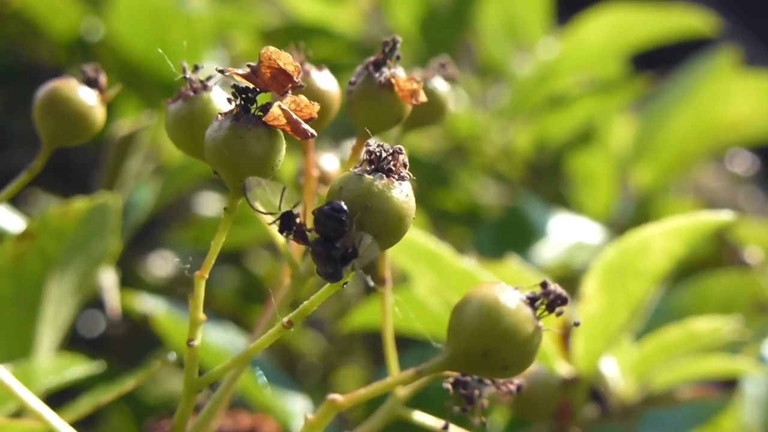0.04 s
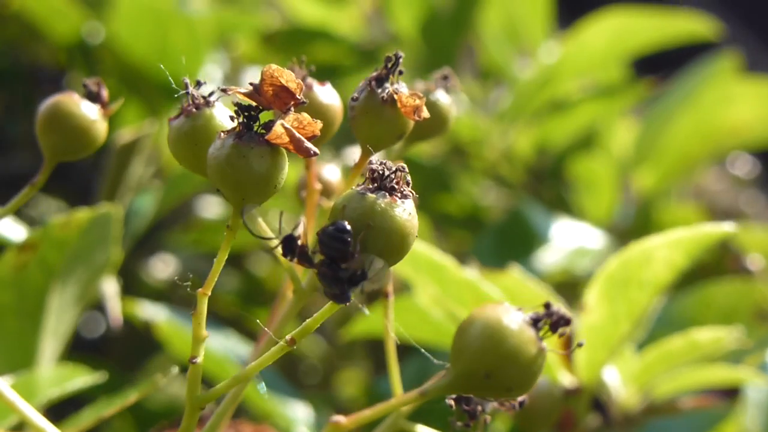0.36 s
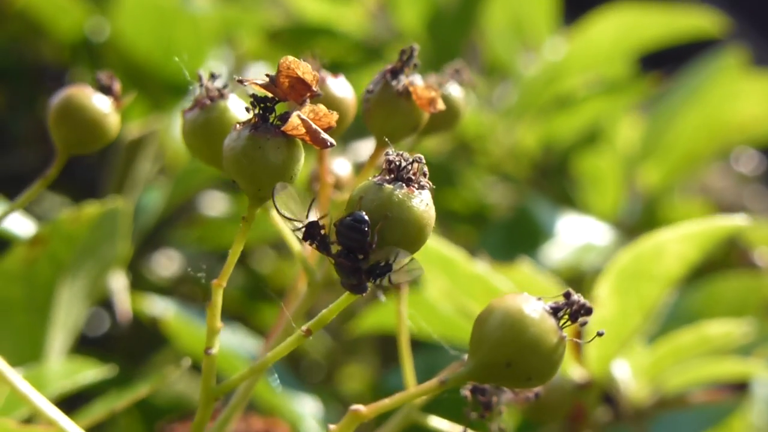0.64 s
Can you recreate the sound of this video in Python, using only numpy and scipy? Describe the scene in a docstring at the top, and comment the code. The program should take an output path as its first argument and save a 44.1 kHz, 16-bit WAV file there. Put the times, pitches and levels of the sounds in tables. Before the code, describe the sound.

Distant traffic roars steadily under thin hiss, with faint bird chirps and a few sharp clicks.

```python
"""Garden with distant traffic

After a moment of silence, a steady wash of far tyre roar cuts in under a thin hiss with faint whines.
A far engine slowly picks up speed, heard only as the hum of its firing rate and the octave above.
A distant bird whistles a few faint chirps. A few sharp handling clicks sit up close,
each a snap and a brief rub that set a camera body ringing."""
import sys
import numpy as np
from scipy import signal
from scipy.fft import rfft, irfft
from scipy.io import wavfile

SR = 44100
rng = np.random.default_rng(int(sys.argv[2]) if len(sys.argv) > 2 else 0)


def digitize_waveform(pressure):
    """Quantize a signal to 16-bit integers and store it at the path in sys.argv[1].

    Rows of a 2-D input are taken as channels; values are limited to [-1, 1].
    """
    field = np.atleast_2d(pressure).T
    bounded = np.clip(field, -1, 1)
    quanta = np.round(bounded * 32767).astype(np.int16)
    wavfile.write(sys.argv[1], SR, quanta)


N = 176400
T = np.arange(N) / SR
BIN_HZ = np.maximum(np.arange(N // 2 + 1) * SR / N, 1)

# The traffic's fader ride. Each row: time in seconds, level in dB, extra weight of the low roar in dB.
TRAFFIC_RIDE = [(.26,-43.5,-0.5),(.7,-45.5,1.5),(1.25,-45,1.5),(1.5,-46,0.6),(2.3,-44.5,-1.5),(3.4,-45.5,-0.2),(3.98,-44.5,-0.3)]
# Tone colours of traffic and hiss; mid is what both ears share, side is what differs between them.
# Each row: frequency in Hz, relative spectral density in dB.
TRAFFIC_MID_COLOUR = [(25,-26),(40,-13),(62,-7.5),(76,-8),(95,0),(160,-1),(225,1.5),(300,-1),(400,-2),(640,-2),(850,-1.7),(1060,-3),(1300,-11),(1700,-17.5),(2600,-25),(5000,-52)]
TRAFFIC_SIDE_COLOUR = [(25,-32),(55,-17),(100,-6.5),(190,-3),(340,-0.5),(1000,-3),(1400,-8),(2000,-16.5),(4000,-17.5)]
HISS_MID_COLOUR = [(800,-6.5),(1900,-1),(3000,1.5),(5000,-0.5),(7000,-1.5),(9500,-3),(10700,-4.5),(12000,-5),(13700,-7.5),(15700,-12)]
HISS_SIDE_COLOUR = [(800,-1),(1800,1.5),(3000,-3),(3700,-4),(4200,-6),(4900,-8),(6000,-10.5),(8000,-13.5),(10500,-16),(13500,-17),(15700,-23)]
# Steady whines in the hiss. Each row: pitch in Hz, level in dB.
HISS_WHINES = [(3906,-82),(6283,-83),(7558,-79.5),(8140,-77),(8785,-83),(9308,-81.5),(10060,-82),(11084,-81.5),(11700,-80.5)]
# The engine gathering speed. Each row: time in seconds, firing rate in Hz, level in dB.
ENGINE_REVS = [(.3,41.3,-78),(.85,44.3,-69),(1.3,46.3,-59.5),(1.7,51.95,-58),(2.2,52.8,-55.5),(2.45,57.65,-61),(2.95,56.3,-57),(3.15,62,-66),(3.35,57.1,-63),(3.6,55.8,-58),(4,56,-54)]
# The bird's calls. Each row: start in seconds, length in seconds, opening pitch in Hz,
# closing pitch in Hz, level in dB.
BIRD_CHIRPS = [(1.715,.06,8000,6700,-63.5),(2.305,.115,5700,5850,-64.5),(2.55,.11,6100,6150,-68),(2.56,.07,4950,4900,-67.5)]
# Handling snaps. Each row: start in seconds, gain in dB, brightness as a low-pass cutoff in Hz,
# decay time of the rub in seconds, extra weight of the low knock in dB.
HANDLING_CLICKS = [(2.3112,-6.5,10500,.0018,0),(3.1064,1.5,3650,.0005,-1),(3.8508,-7,1900,.001,6),(3.8518,-7,14000,.001,2),(3.85224,-6.5,14000,.0012,6)]
# Resonances of the camera body. Each row: pitch in Hz, gain in dB, time to fade by 60 dB in seconds.
CAMERA_MODES = [(1350,-41,.008),(1920,-27,.01),(2600,-30,.005),(3600,-22.5,.003),(4750,-24,.004),(7400,-38,.003),(8900,-33,.003),(11200,-30,.003),(13700,-22.5,.003),(14700,-28,.003)]


def from_db(db):
    """Decibels to gain."""
    return 10 ** (np.asarray(db) / 20)


def unit_rms(x):
    """Scale to unit power."""
    return x / np.sqrt(np.mean(x ** 2) + 1e-20)


def automation(rows):
    """Draw straight lines between timed breakpoints, one curve for each value column."""
    times, *columns = np.transpose(rows)
    return [np.interp(T, times, column) for column in columns]


def drift(rate_hz):
    """A smooth random wander of unit power, mostly slower than rate_hz."""
    return unit_rms(irfft(rfft(rng.standard_normal(N)) / (1 + (BIN_HZ / rate_hz) ** 2), N))


def ring(x, hz, t60):
    """One resonance driven by x, dying away by 60 dB in t60 seconds."""
    decay, angle = from_db(-60 / (t60 * SR)), 2 * np.pi * hz / SR
    feedback = decay * np.cos(angle)
    return signal.lfilter([1, -feedback], [1, -2 * feedback, decay ** 2], x + 1e-18)


def wash(colour, swell_db, rate_hz, bands=16):
    """Coloured noise of unit power whose bands each swell and fade a little on their own."""
    hz, db = np.transpose(colour)
    spectrum = rfft(rng.standard_normal(N)) * from_db(np.interp(np.log(BIN_HZ), np.log(hz), db))
    spectrum /= (1 + (hz[0] / 2 / BIN_HZ) ** 4) * (1 + (BIN_HZ / hz[-1] / 2) ** 4)  # roll off both ends
    band_of_bin = np.searchsorted(np.geomspace(hz[0], hz[-1], bands - 1), BIN_HZ)
    layers = (irfft(spectrum * (band_of_bin == k), N) for k in range(bands))
    return unit_rms(sum(layer * from_db(swell_db * drift(rate_hz)) for layer in layers))


def stereo(mid, side):
    """Left and right from mid and side."""
    return np.array([mid + side, mid - side])


def traffic():
    """Tyre roar blurred by distance, with little above a kilohertz; its low end swells, then recedes."""
    level_db, roar_db = automation(TRAFFIC_RIDE)
    mid = from_db(.5) * wash(TRAFFIC_MID_COLOUR, swell_db=1.14, rate_hz=1.8)
    side = from_db(-6) * wash(TRAFFIC_SIDE_COLOUR, swell_db=1.14, rate_hz=12)
    bed = stereo(mid, side)
    low_roar = signal.sosfiltfilt(signal.butter(3, 550, fs=SR, output="sos"), bed)
    return from_db(level_db) * (bed + (from_db(roar_db) - 1) * low_roar)


def hiss(whine_width_hz=50):
    """Wide, even hiss with narrow bands of noise whining in the centre."""
    white = rng.standard_normal(N)
    t60 = np.log(1000) / np.pi / whine_width_hz
    whines = sum(from_db(db) * unit_rms(ring(white, hz, t60)) for hz, db in HISS_WHINES)
    mid = from_db(-59) * wash(HISS_MID_COLOUR, swell_db=.5, rate_hz=12, bands=6)
    side = from_db(-54) * wash(HISS_SIDE_COLOUR, swell_db=.5, rate_hz=20, bands=6)
    return stereo(mid + whines, side)


def engine(octave_db=-10.5, flutter_db=1):
    """A low, fluttering hum: only the firing rate and its octave carry this far."""
    firing_hz, level_db = automation(ENGINE_REVS)
    phase = 2 * np.pi * np.cumsum(firing_hz) / SR
    octave = from_db(octave_db + 2.4 * drift(3.4)) * np.sin(2 * phase)
    hum = np.sqrt(2) * (np.sin(phase) + octave)
    return from_db(level_db + flutter_db * drift(5)) * hum


def bird(arch_hz=250, waver_hz=65):
    """Thin, far whistles that glide in pitch, arching up as they swell."""
    chirps, waver = np.zeros(N), waver_hz * drift(106)
    for start_s, length_s, from_hz, to_hz, db in BIRD_CHIRPS:
        progress = np.clip((T - start_s) / length_s, 0, 1)
        arch = np.sin(np.pi * progress)
        pitch_hz = from_hz + (to_hz - from_hz) * progress + arch_hz * arch + waver
        chirps += from_db(db) * arch * np.sin(2 * np.pi * np.cumsum(pitch_hz) / SR)
    return chirps


def snap(rub_s, rub_db=-19):
    """A sharp push with a brief noisy rub for a tail, one for each side."""
    age = T[:SR // 20]
    force = from_db(rub_db) * rng.standard_normal((2, len(age))) * np.exp(-age / rub_s)
    force[:, 0] = 1  # the push
    return force


def handling(crack_db=-23, knock_below_hz=3000, left_db=-5, left_lag_s=.00002):
    """Each snap cracks and rings the camera body, which pushes the two microphones in opposite senses."""
    clicks = np.zeros((2, N + SR))
    for start_s, db, bright_hz, rub_s, knock_db in HANDLING_CLICKS:
        force = signal.sosfilt(signal.butter(3, bright_hz, fs=SR, output="sos"), snap(rub_s))
        body = sum(from_db(mode_db + knock_db * (hz < knock_below_hz)) * ring(force, hz, t60)
                   for hz, mode_db, t60 in CAMERA_MODES)
        start = int(start_s * SR)
        clicks[:, start:start + force.shape[1]] += from_db(db) * (from_db(crack_db) * force + body)
    left, right = clicks[:, :N]
    late_left = np.interp(T - left_lag_s, T, left)
    return np.array([-from_db(left_db) * late_left, right])


def scene():
    """The garden mix: a bed of traffic and hiss, engine and bird far off, clicks up close."""
    return traffic() + hiss() + engine() + bird() + handling()


def record(dry):
    """Cut in hard after a moment of silence and shave off the very top with a steep low-pass."""
    start_s, fade_s, cutoff_hz = .233, .002, 16050
    gate = np.clip((T - start_s) / fade_s, 0, 1)
    return signal.sosfiltfilt(signal.butter(40, cutoff_hz, fs=SR, output="sos"), dry * gate)


dry = scene()
out = record(dry)
digitize_waveform(out)
```